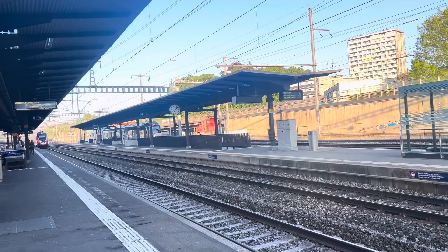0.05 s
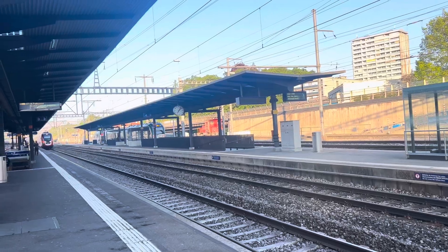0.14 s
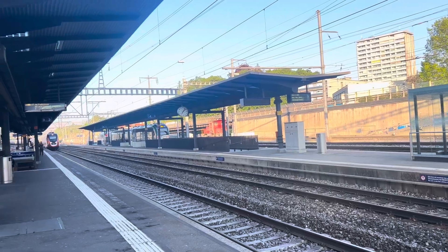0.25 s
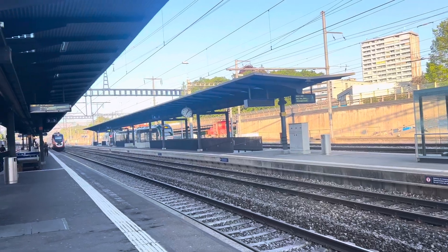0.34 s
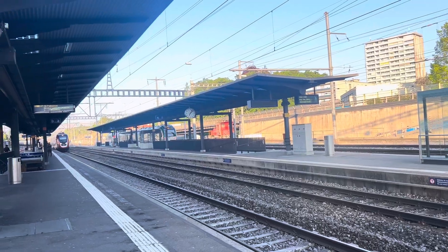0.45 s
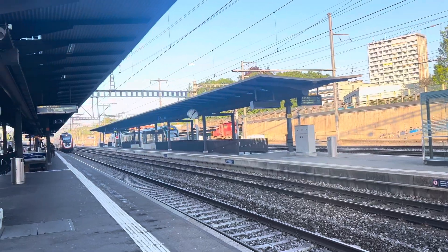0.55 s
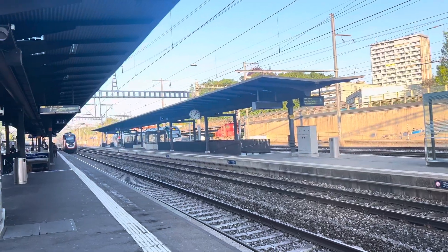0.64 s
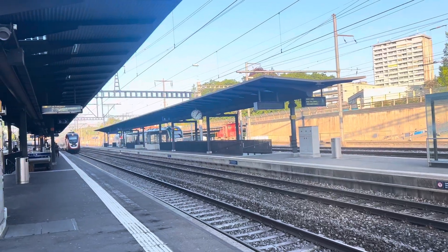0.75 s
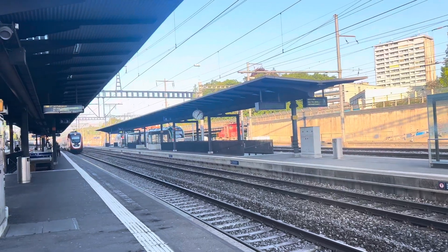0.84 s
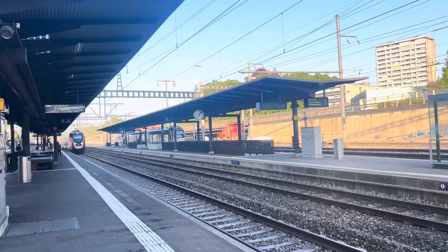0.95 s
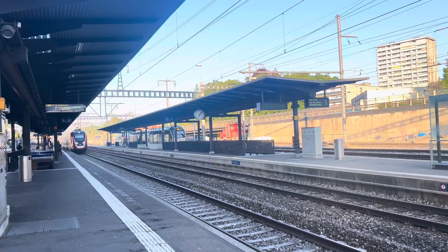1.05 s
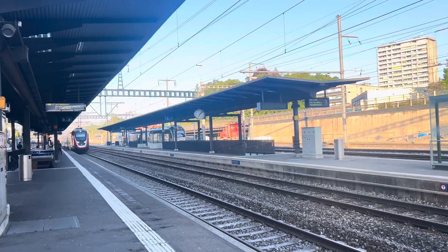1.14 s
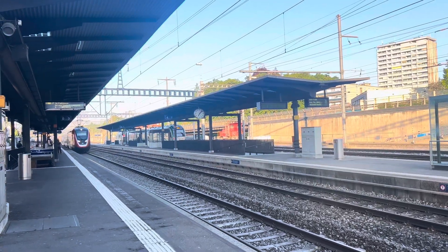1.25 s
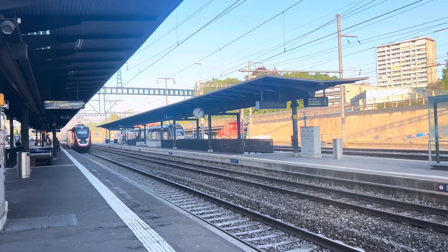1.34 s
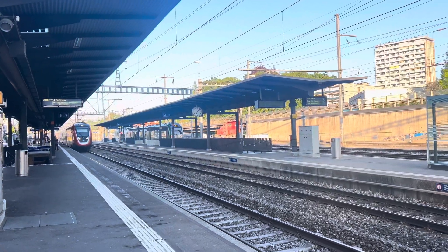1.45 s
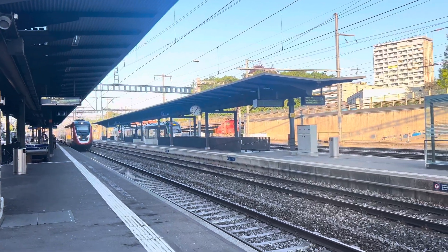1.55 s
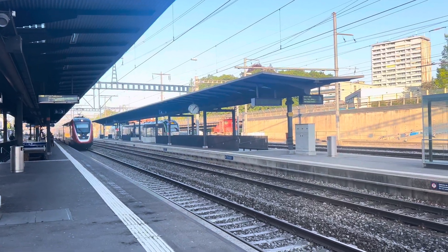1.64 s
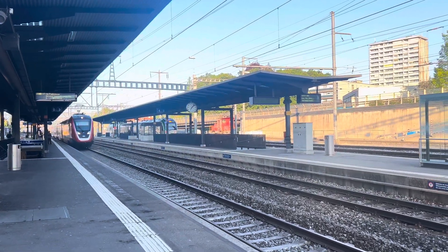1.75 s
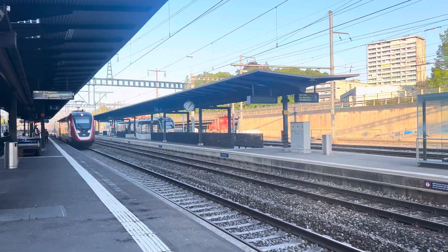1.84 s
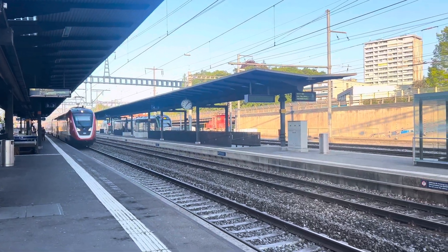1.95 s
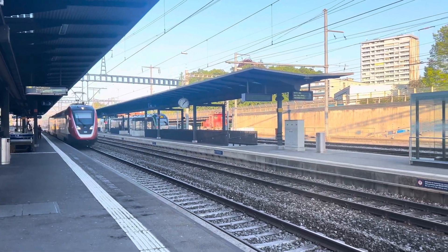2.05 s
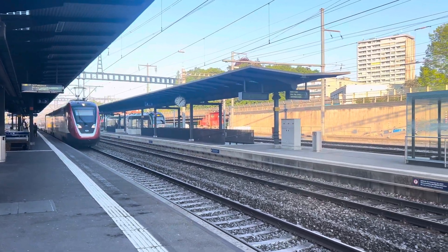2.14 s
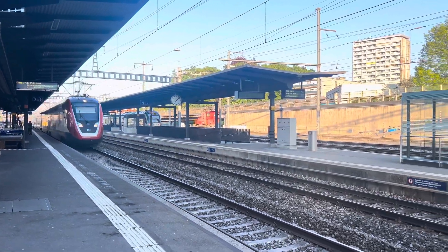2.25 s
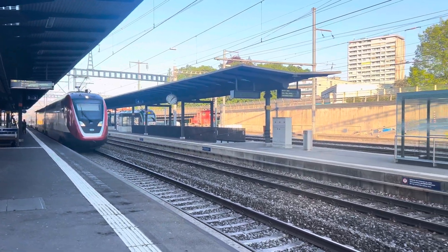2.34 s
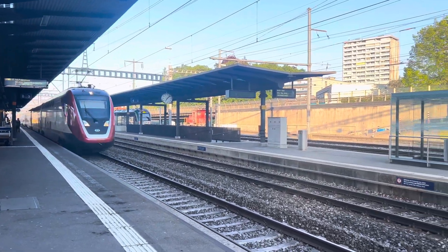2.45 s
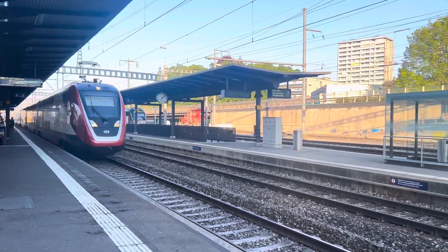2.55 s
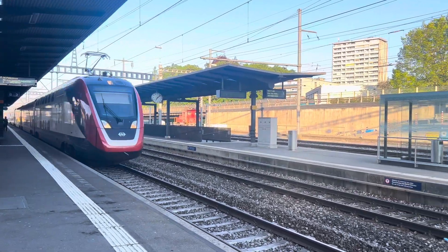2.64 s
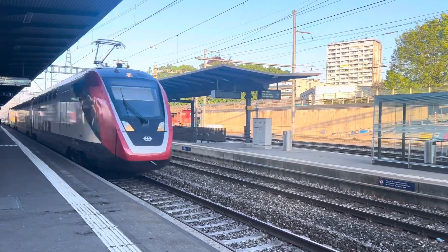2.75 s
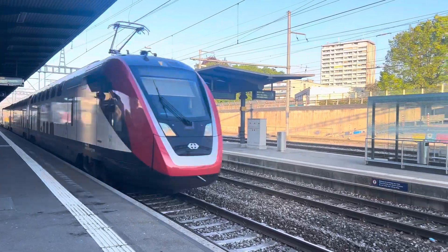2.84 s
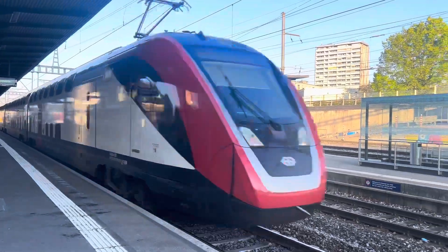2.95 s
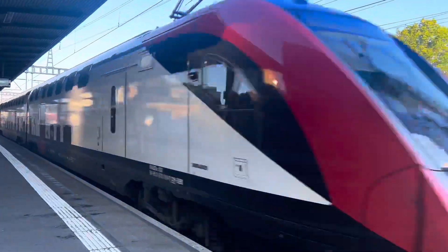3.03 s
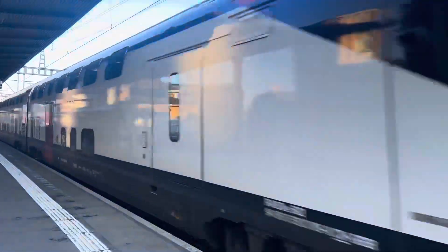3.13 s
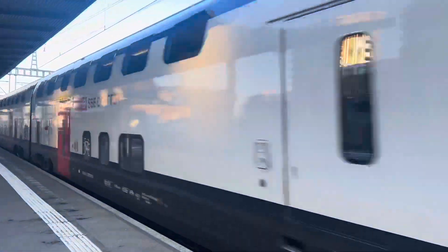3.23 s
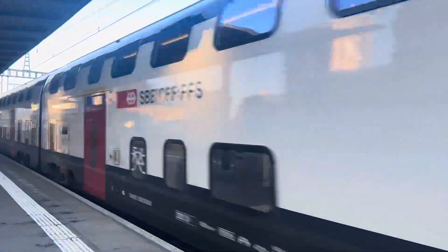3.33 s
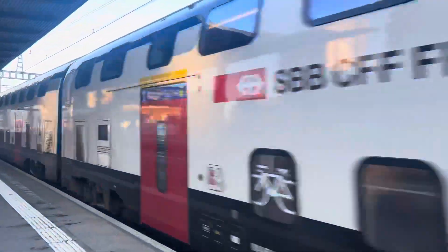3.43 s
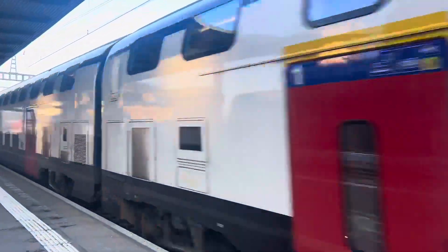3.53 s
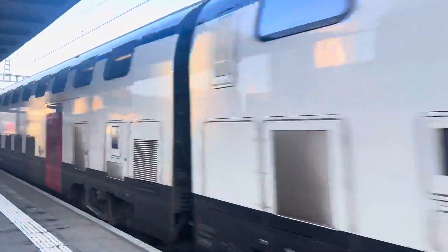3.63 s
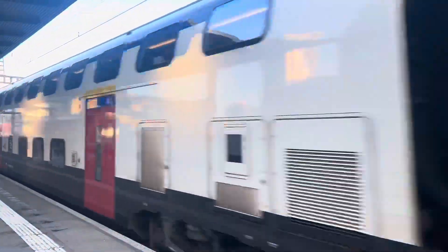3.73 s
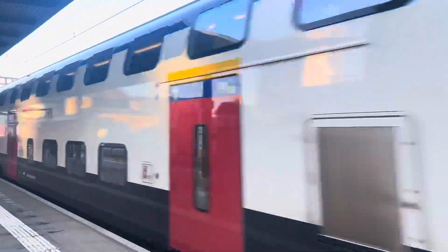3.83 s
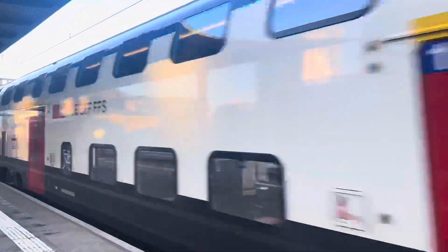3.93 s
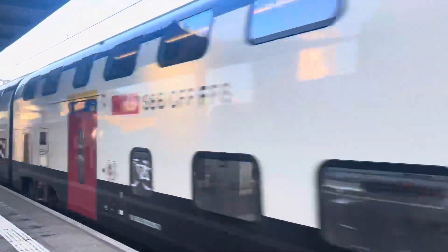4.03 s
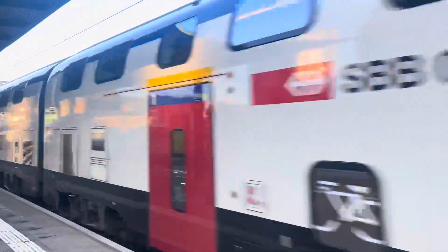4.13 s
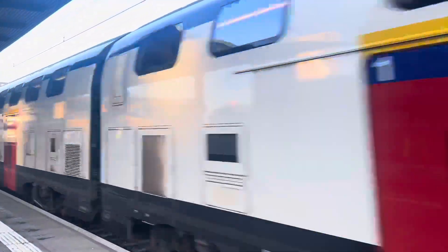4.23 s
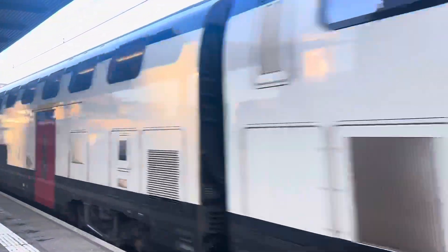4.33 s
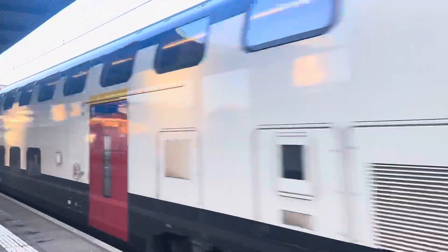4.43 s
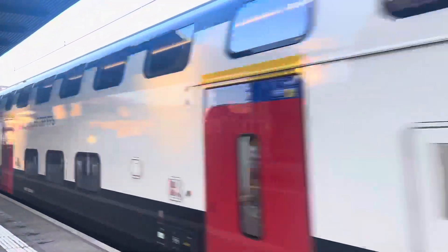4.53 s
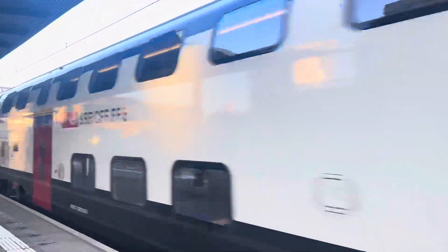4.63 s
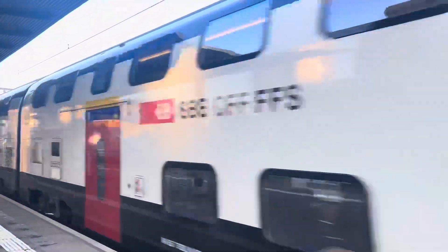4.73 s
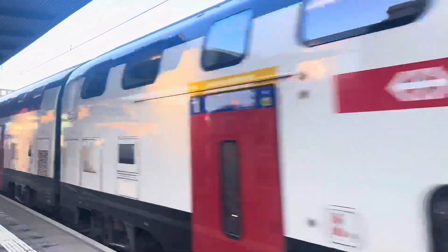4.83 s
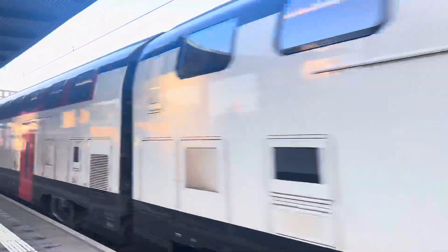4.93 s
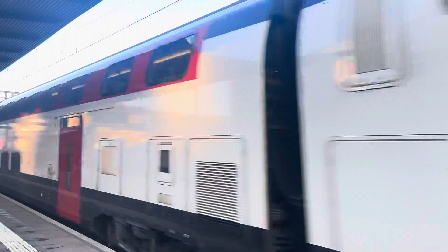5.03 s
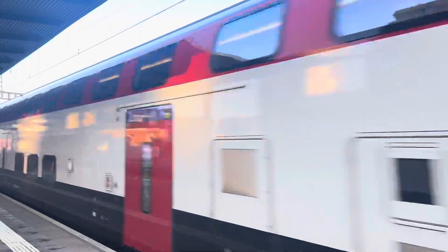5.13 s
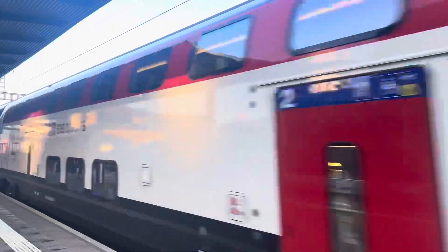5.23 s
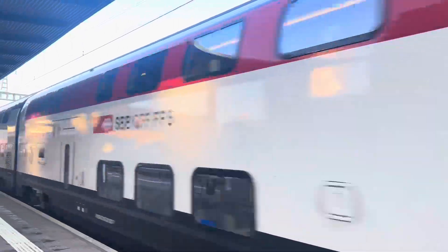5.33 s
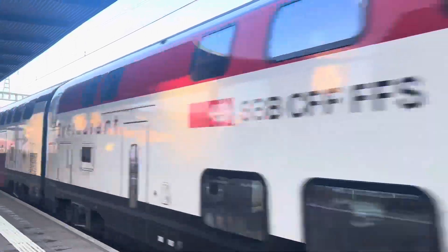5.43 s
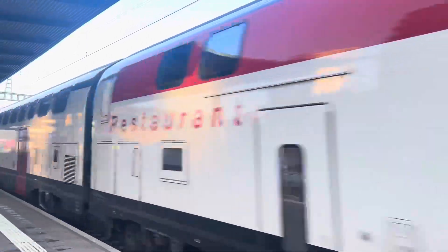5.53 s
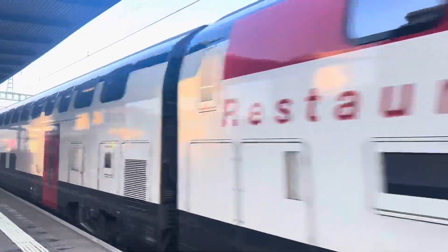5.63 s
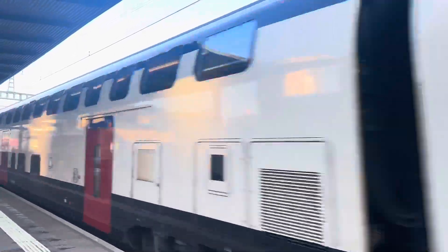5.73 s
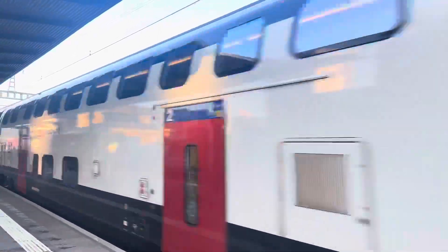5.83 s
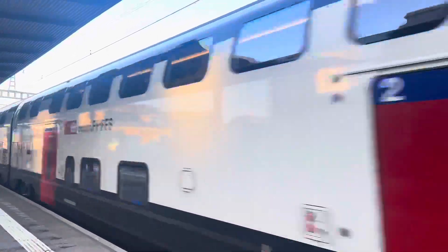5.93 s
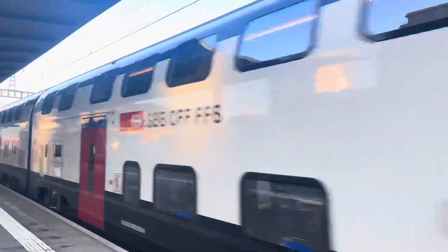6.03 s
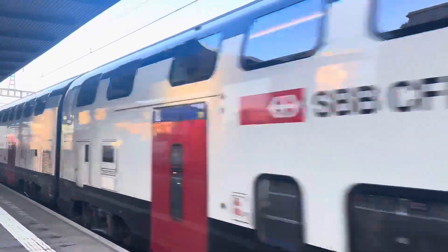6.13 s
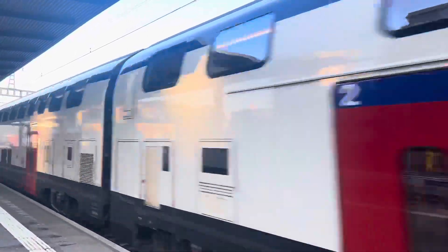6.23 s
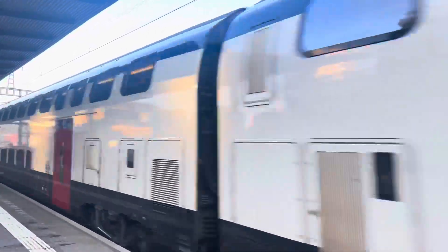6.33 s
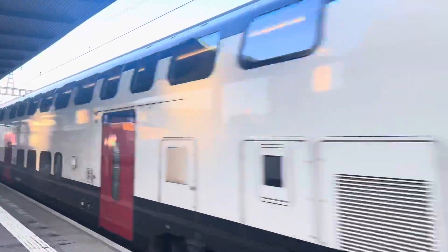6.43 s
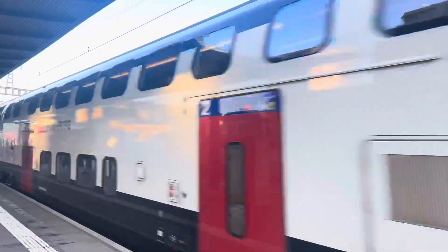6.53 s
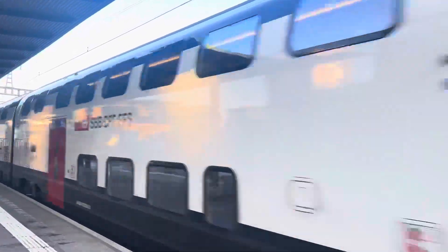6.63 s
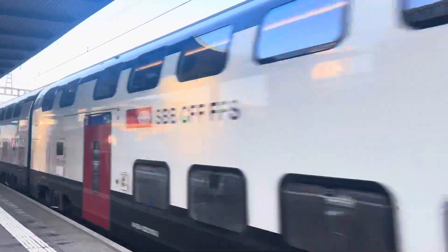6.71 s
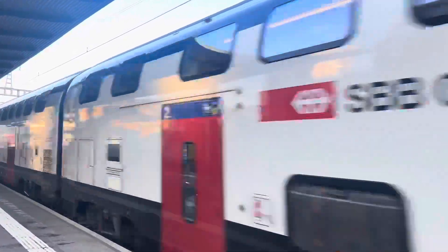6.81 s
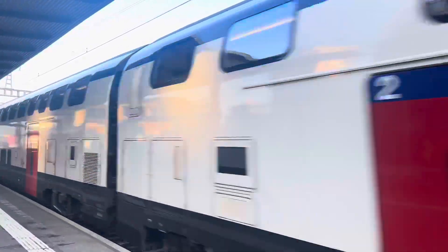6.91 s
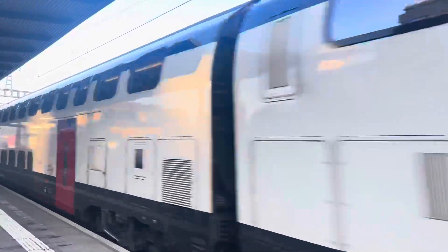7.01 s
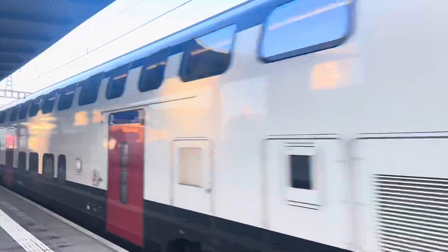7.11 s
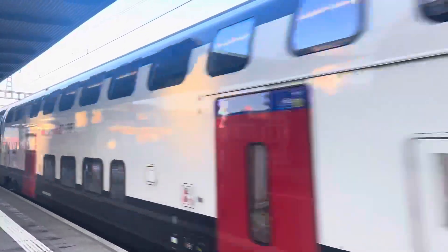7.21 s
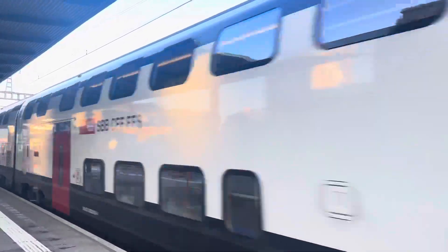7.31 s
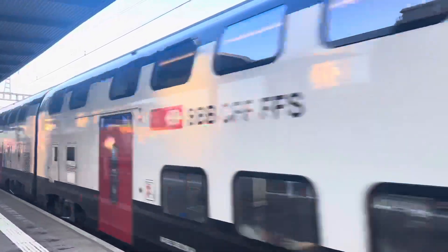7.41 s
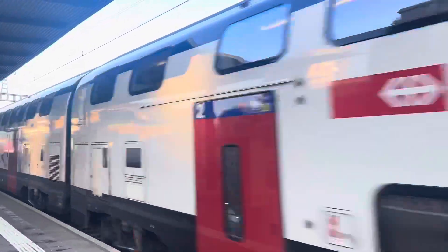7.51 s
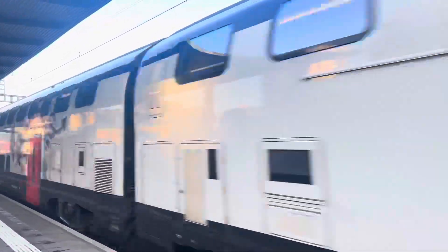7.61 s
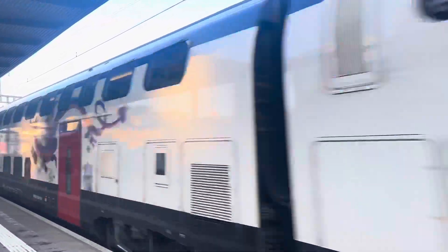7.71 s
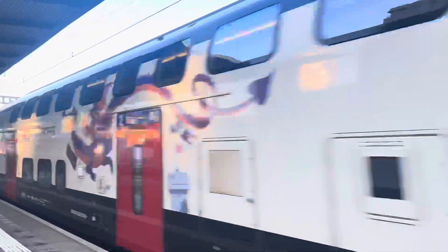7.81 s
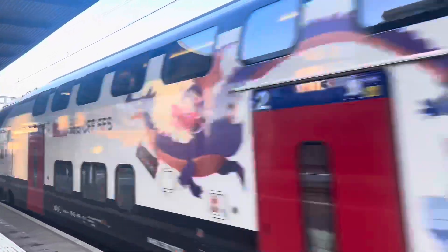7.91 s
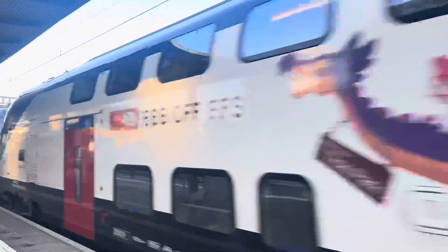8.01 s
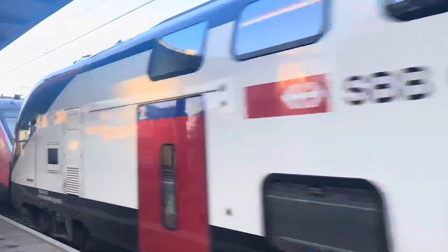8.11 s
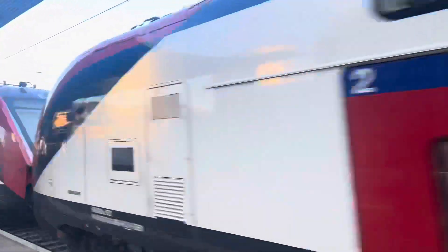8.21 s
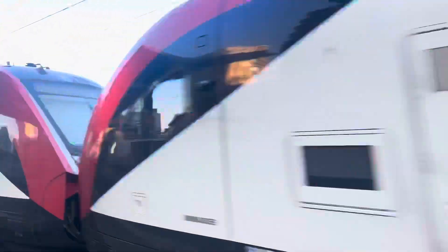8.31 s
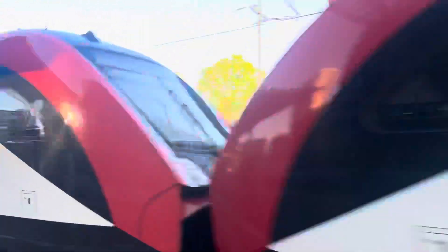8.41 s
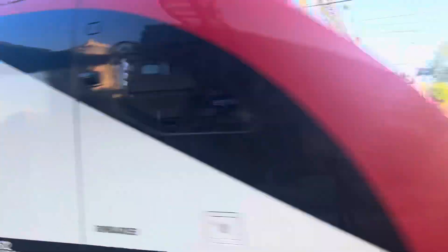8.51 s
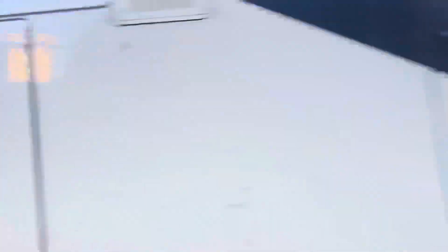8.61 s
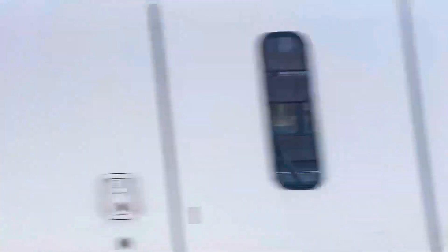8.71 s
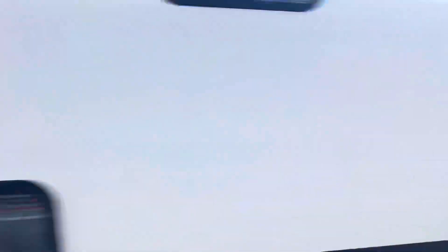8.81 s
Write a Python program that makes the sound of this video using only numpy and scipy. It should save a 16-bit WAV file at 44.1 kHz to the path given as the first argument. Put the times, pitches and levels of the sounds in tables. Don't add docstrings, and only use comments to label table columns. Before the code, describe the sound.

From 0 to 2 seconds, a distant electric train is heard from a canopied platform: low rumble, broad rushing hiss and a faint, fluttering motor whine around the middle pitches. From 2 to 2.9 the roar and whine swell quickly. Around 3.0 the nose passes and the whine is cut off as a massive burst of rumble, wheel roar and torn air peaks near 3.2, slightly overloaded. Between 3.3 and 4.6 short gear tones drop in pitch, ending in a low growl. Paired bogies surge at about 3.7, 4.4, 5.1, 5.8, 6.5, 7.2, 7.8 and 8.5, with ringing rails, rough clattering wheels and short narrow singing tones; a thin high vent whistle flickers near 7.2. Later surges have less wheel and air noise, while the deep rumble persists to about 9 seconds. Close stereo microphones hear each bogie sweep from one side to the other.

```python
import sys
import numpy as np
from scipy import signal
from scipy.io import wavfile
from scipy.ndimage import uniform_filter1d, map_coordinates

SR = 44100
rng = np.random.default_rng(int(sys.argv[2]) if len(sys.argv) > 2 else 0)


def invert_db(x):
    u = np.asarray(x, float) / 20
    return 10 ** u


def file_out(sig):
    cols = np.atleast_2d(sig).T
    lim = np.clip(cols, -1, 1)
    pcm = np.round(lim * 32767).astype(np.int16)
    wavfile.write(sys.argv[1], SR, pcm)


N = 390726

# f/Hz, density/(dB per Hz)
RUMBLE = [(25, -45), (40, -26), (60, 13.5), (85, 1.5), (120, 2), (170, -39)]
RAIL = [(120, -4.5), (170, 0.5), (260, 3.5), (330, -1.5), (450, -10.5)]
TRACK = [(400, 1), (520, 0), (700, 0), (950, -5.5)]
WHEEL = [(850, -7), (1050, 2.5), (1250, 1.6), (1650, -2.5), (1900, -4.5), (2100, -5), (2600, -16),
         (3300, -29)]
AIR = [(2400, -0.5), (3500, -2), (4700, -2), (5400, -4.5), (6100, -10), (8000, -14.5), (9500, -14),
       (11300, -14.5), (12200, -23), (13600, -26), (14600, -50)]
# level abreast/dB, half-width/s, fall-off power, share of funnel gain, floor/dB
RUMBLE_PASS = (-25, 0.1843, 1.12, 0.86, -45)
RAIL_PASS = (-25, 0.165, 1.25, 0.63, -48.5)
TRACK_PASS = (-26.5, 0.1466, 1.1, 0.68, -66.5)
WHEEL_PASS = (-25, 0.1532, 1.34, 1.45, -52)
AIR_PASS = (-33.5, 0.18, 1.0765, 0.94, -82)
LATE_S = (.07, .015, -.005, -.005, .015)
# f/Hz, level/dB
AHEAD = [(40, 11.3), (70, 15.5), (260, 1), (700, 1), (1150, -2.5), (1700, -3), (2300, -2), (3500, -3.5),
         (4700, -1.5), (6200, -2.5), (8300, 0.5), (9600, 2), (12000, 6.5), (14400, 19)]
# t abreast/s, load/dB, rail shake/dB, tread roughness/dB, turbulence/dB
AXLES = [(3.01, -13, 2, -3.5, -4), (3.19, 4.5, 4, 3, 6.5), (3.64, -4, 1.5, 2, 1.5), (3.82, 2, -1.5, 1.5, 2),
         (4.351, -2.5, -0.5, 0, -5.5), (4.5, 0.5, 0, 0, 2.5), (5.03, 1, -2, -1.5, -2),
         (5.21, -6, -3, -1, 0), (5.7, -2, -0.5, -2, -5), (5.891, -4, -1.5, -1.5, -0.5),
         (6.42, -1, -2, -3, -7.5), (6.57, -1, 0, 0, -0.5), (7.08, 0.5, 2.5, -4, -6),
         (7.26, 1.5, 3.5, -1.5, -0.5), (7.72, -5, -2, -5, -5.5), (7.91, -8.5, -2.5, -3.5, -3),
         (8.4, 0, -3, -7, -4.5), (8.62, -2, -1.5, -3, -4), (8.9, 0.5, -2, -9, -11)]


def rolling(hz, t, far):
    abreast_s, load_db, shake_db, tread_db, swirl_db = np.transpose(AXLES)
    drives = (load_db, shake_db, (shake_db + tread_db) / 2, tread_db, swirl_db)
    laws = (RUMBLE_PASS, RAIL_PASS, TRACK_PASS, WHEEL_PASS, AIR_PASS)
    spectra = (RUMBLE, RAIL, TRACK, WHEEL, AIR)
    flutter_settings = [(0.54, 19), (0.27, 9), (0.23, 8), (0.23, 12), (0.2, 8.2)]  # depth/dB, rate/Hz
    tint = invert_db(along(AHEAD, hz) * far) ** 2
    power = 0
    for spectrum, drive_db, law, late_s, (depth_db, rate) in zip(spectra, drives, laws, LATE_S, flutter_settings):
        level = passing(t, abreast_s + late_s, drive_db, law)
        flutter_db = depth_db * wobble(rate, t)
        layer = closed(spectrum, hz) * tint
        power = power + layer / layer.sum(axis=0) * level * invert_db(2.5 + flutter_db) ** 2
    clumps = patches(power.shape, depth_db=0.39, tall=9.5, wide=1.4)
    modes = patches(power.shape, depth_db=1.52, tall=4, wide=9)
    absorb_db, knee_hz, nose_s = 5.5, 5770, 3.84
    treble = hz ** 2 / (hz ** 2 + knee_hz ** 2)
    lost_db = absorb_db * np.outer(treble, np.clip(nose_s - t, 0, None))
    return power * (clumps * modes / invert_db(lost_db)) ** 2


# t/s, gain/dB
FUNNEL = [(0, 5.5), (.9, 4.5), (1.6, 6), (2.2, 5), (2.55, 5), (2.8, 2.5), (3.1, 0.5)]


def passing(t, peak_s, strength_db, law):
    db, width_s, fall, share, floor_db = law
    apart = (t - peak_s[:, None]) / width_s
    apart = np.where(apart > 0, apart / 0.67, apart)
    heard = invert_db(db + strength_db[:, None]) ** 2 / (1 + apart ** 2) ** fall
    funnel_db = np.interp(t, *np.transpose(FUNNEL))
    return heard.sum(axis=0) * invert_db(share * funnel_db) ** 2 + invert_db(floor_db) ** 2


# t/s, level/dB
MOTOR = [
    (0, -56),
    (.8, -47),
    (1.3, -47),
    (2.15, -42),
    (2.45, -35),
    (2.62, -35),
    (2.74, -39),
    (2.88, -30),
    (2.96, -40),
]
# multiple of f, level/dB, roughness, fade/(dB per s)
MOTOR_ORDERS = [
    (1, 1.5, 1.0, .1),
    (.615, 2, 1.1, 3.5),
    (.73, 7, .8, 11),
    (1.985, -10, .6, 2),
    (1.06, -3, .9, 2.5),
]


def motor():
    t = np.arange(N) / SR
    motor_hz = 1138
    level_db = np.interp(t, *np.transpose(MOTOR), right=-120)
    out = 0
    for multiple, db, rough, loss_db in MOTOR_ORDERS:
        out = out + tone(np.full(N, multiple * motor_hz), level_db + db + 3 - loss_db * t, rough)
    return out


# t start/s, t end/s, f start/Hz, f end/Hz, level/dB
GEARS = [
    (3.32, 3.74, 947, 890, -29),
    (3.72, 4.14, 820, 775, -42),
    (4.1, 4.58, 280, 262, -27),
    (3.03, 3.38, 2056, 2040, -43),
]


def gears():
    t = np.arange(N) / SR
    out = 0
    for start, end, from_hz, to_hz, db in GEARS:
        u = np.clip((t - start) / (end - start), 0, 1)
        pitch = from_hz + (to_hz - from_hz) * u ** 6
        swell = np.sqrt(abs(np.sin(np.pi * u))) * invert_db(11 * u - 7)
        out = out + swell * tone(pitch, db + 8, rough=.95)
    return out


def tone(hz, db, rough):
    t = np.arange(N) / SR
    turns = np.cumsum(hz) / SR
    shake_db = 3.2 * rough * wobble(10, t)
    drift = rough * 1.1 * wobble(18, t)
    ports = []
    for lead in (0, 1.5):
        ports.append(np.sin(2 * np.pi * turns + drift + lead + .3 * wobble(5, t)))
    return invert_db(db + shake_db) * np.array(ports)


# t abreast/s, f/Hz, width/Hz, level/dB,
# length/s
SONGS = [(2.95, 666, 30, -26, 0.078), (3.156, 116, 87, -18, 0.2), (3.645, 1200, 61, -19, 0.049),
         (3.73, 1670, 92, -25, 0.1), (4.354, 1210, 86, -22.5, .1), (4.358, 1600, 170, -29, 0.15),
         (4.954, 650, 130, -23.5, 0.041), (5.8, 1440, 420, -28.5, 0.086), (6.498, 1170, 61, -25.5, 0.081),
         (6.5, 1600, 170, -24, 0.05), (6.55, 245, 30, -28, 0.45), (7.206, 1560, 600, -22.5, 0.05),
         (7.207, 273, 220, -16, 0.032), (7.414, 425, 20, -23, 0.063), (7.25, 11800, 490, -42, .02),
         (7.753, 740, 40, -33, .04), (7.86, 1174, 100, -24, 0.077), (8.48, 1166, 140, -27, 0.28)]


def songs(hz, t):
    mach = 0.1
    vent = (7.18, 12400, 300, -50, 0.14)
    singers = [(row, 0.18) for row in SONGS] + [(vent, 1.2)]
    power = 0
    for (s, centre_hz, width_hz, db, length), drop in singers:
        u = (t - s) / length
        pitch = centre_hz * (1 - drop * mach * u / np.sqrt(1 + u * u))
        line = 1 / (1 + ((hz[:, None] - pitch) / (width_hz / 2)) ** 4)
        power = power + line / line.sum(axis=0) * invert_db(db) ** 2 * np.exp(-u * u)
    return power


# t/s, level/dB
BOGIES = [
    (3.05, 1.5),
    (3.65, -0.5),
    (4.3, -3.5),
    (5.0, -2.5),
    (5.7, -3.5),
    (6.4, 0.5),
    (7.15, 0),
    (7.75, 0),
    (8.5, -9),
]
# f/Hz, likeness 0-1
DIRECT = [(60, .96), (140, .9), (320, .76), (600, .52), (1150, .72), (1650, .9), (2200, .75), (2900, .5),
          (3600, .72), (4600, .88), (5800, .75), (6400, .02)]
# f/Hz, likeness beside 0-1, likeness ahead 0-1, phase/half turns
HOUSING = [(5600, .02, .02, -.2), (6500, .4, .8, -.1), (8000, .4, .65, .2), (9200, .75, .9, .95),
           (10300, .82, .95, 1.05), (11000, .6, .6, 1.4), (11550, .6, .6, 1.65), (11750, .99, .99, 1.99),
           (13700, .99, .99, 2.01), (13950, .6, .7, 2.15), (14400, .4, .6, 2.4), (14800, .9, .9, 2.95)]


def likeness(hz, t, far):
    lag_ahead, lag_behind = -6.5, 18.27
    total, weight = 0, 0
    low_hz = hz[hz < 6600, None]
    for s, db in BOGIES:
        bearing = (t - s) / np.hypot(t - s, .13)
        lag = lag_ahead + (lag_behind - lag_ahead) * (1 + bearing) / 2
        heard = invert_db(db) ** 2 * invert_db(3.7 * bearing) / (1 + ((t - s - .08) / 1.23) ** 2)
        total = total + heard * np.exp(2j * np.pi * low_hz * lag / SR)
        weight = weight + heard
    coupled = along(HOUSING, hz) * (1 - far) + along(HOUSING, hz, column=2) * far
    alike = coupled * np.exp(1j * np.pi * along(HOUSING, hz, column=3))
    alike[:len(low_hz)] += along(DIRECT, low_hz[:, 0]) * total / weight
    return alike / np.maximum(1, abs(alike))


def along(points, hz, column=1):
    p = np.transpose(points)
    return np.interp(np.log(hz + 1), np.log(p[0] + 1), p[column])[:, None]


def closed(points, hz):
    below = (points[0][0] / 2, points[0][1] - 30)
    above = (points[-1][0] * 2, points[-1][1] - 30)
    return invert_db(along([below] + list(points) + [above], hz)) ** 2


def wobble(rate, t):
    knots = int(t[-1] * rate)
    fine = np.arange(knots * 8 + 16) / 8
    return np.interp(t * rate, fine, map_coordinates(rng.standard_normal(knots + 4), [fine]))


def patches(shape, depth_db, tall, wide):
    field = uniform_filter1d(rng.standard_normal(shape), int(tall), axis=0)
    field = uniform_filter1d(field, int(wide), axis=1)
    return invert_db(depth_db * field / field.std())


# f/Hz, level beside/dB, level ahead/dB
LEAN = [(200, .5, -0.5), (860, 0.8, 7), (1170, 2.5, 2.5), (1600, 6.5, 7), (2450, 1, -2), (3560, 5, 3.5),
        (5160, 6, 11.5), (5700, 1, 1), (8350, 4.5, 3), (9700, -0.5, 3.5)]


def scene():
    frames = dict(nperseg=2048, noverlap=1536)
    hz, t, (a, b) = signal.stft(rng.standard_normal((2, N)), SR, **frames)
    far = np.interp(t, (1.9, 3.7), [1, 0])
    size = np.sqrt(len(hz) * (rolling(hz, t, far) + songs(hz, t)))
    alike = likeness(hz, t, far)
    lean = invert_db((along(LEAN, hz) * (1 - far) + along(LEAN, hz, column=2) * far) / 2)
    right = alike * a + np.sqrt(abs(1 - abs(alike) ** 2)) * b
    ports = np.array([a * lean, right / lean]) * size
    noise = signal.istft(ports, SR, **frames)[1][:, :N]
    return noise + motor() + gears()


def low_pass(x):
    return signal.sosfilt(signal.butter(12, 15080, fs=SR, output="sos"), x)


def record(dry):
    rounded = dry / (1 + dry ** 4) ** (1 / 4)
    return low_pass(rounded)


dry = scene()
out = record(dry)
file_out(out)
```